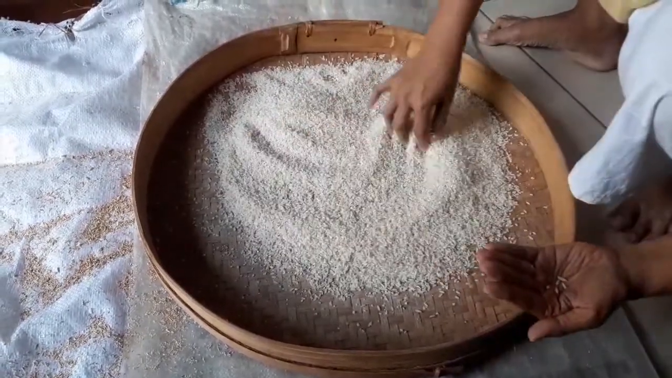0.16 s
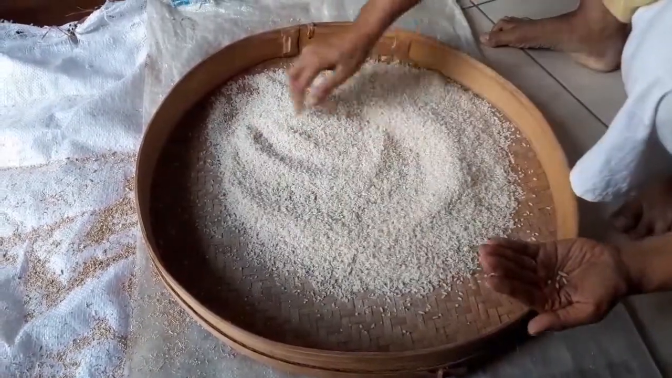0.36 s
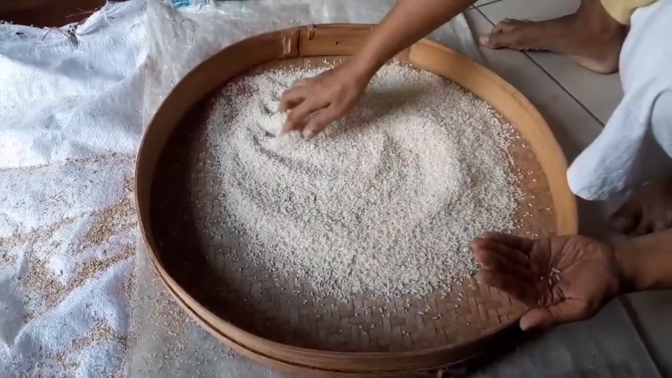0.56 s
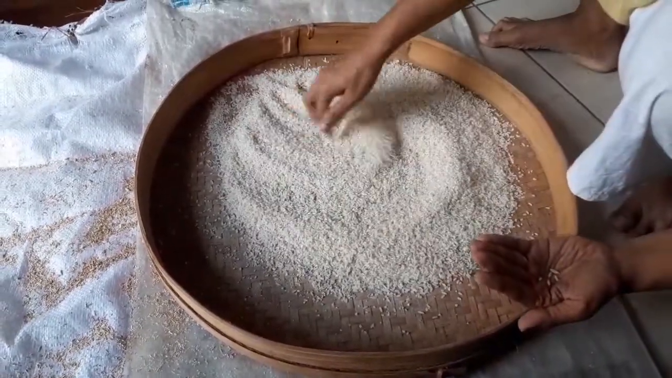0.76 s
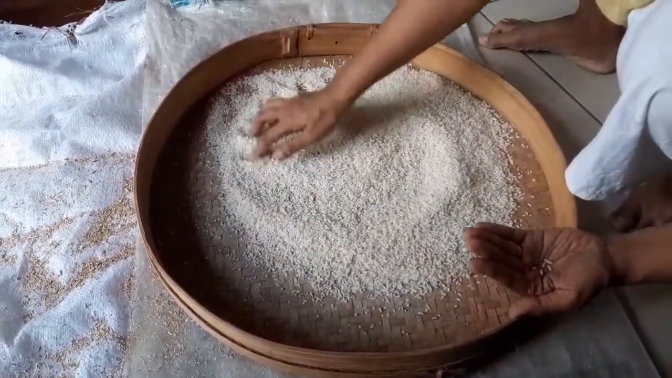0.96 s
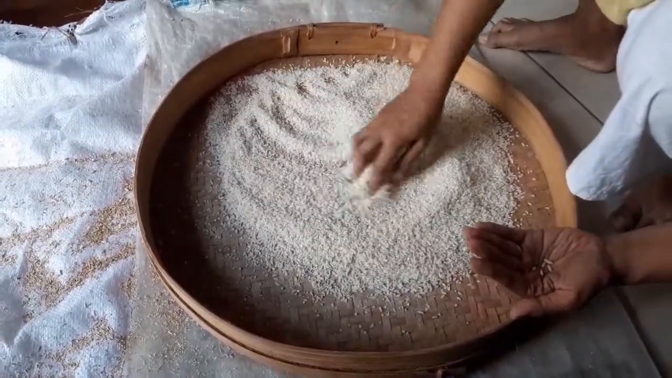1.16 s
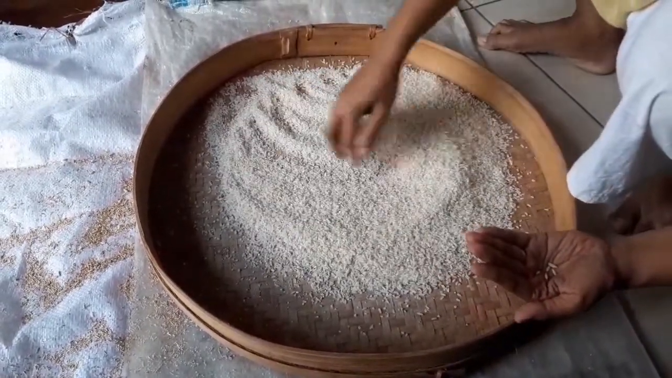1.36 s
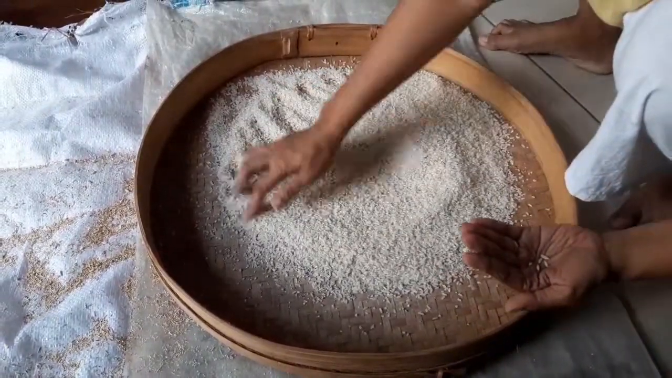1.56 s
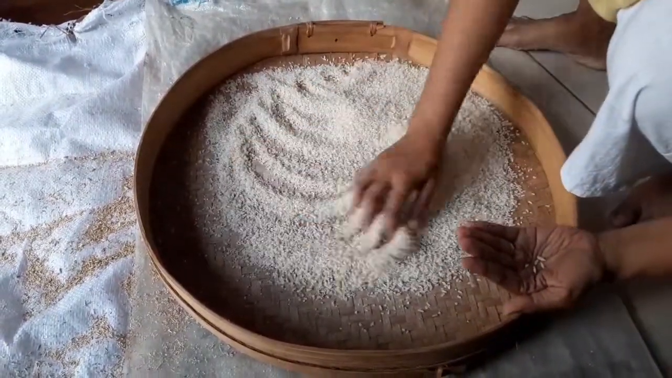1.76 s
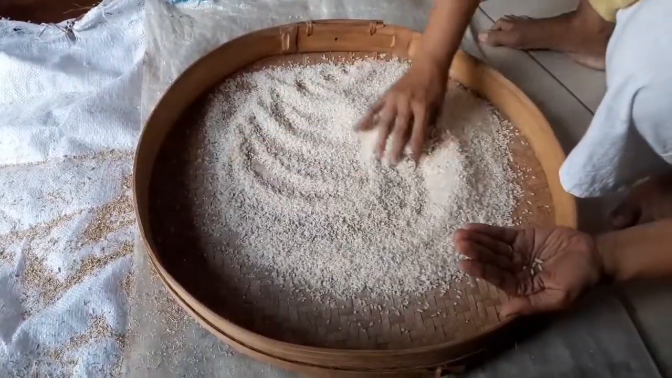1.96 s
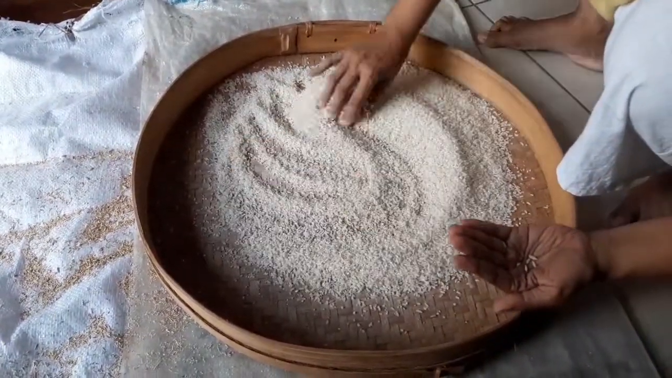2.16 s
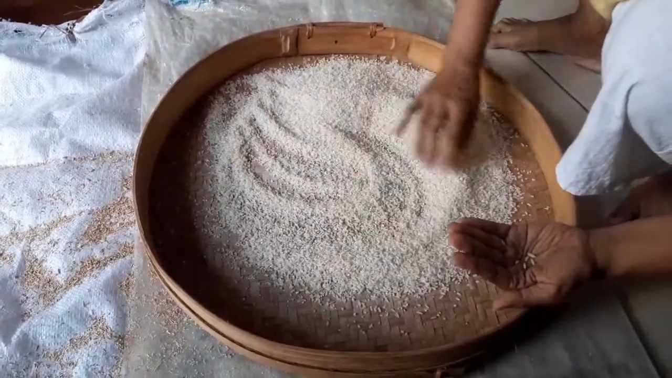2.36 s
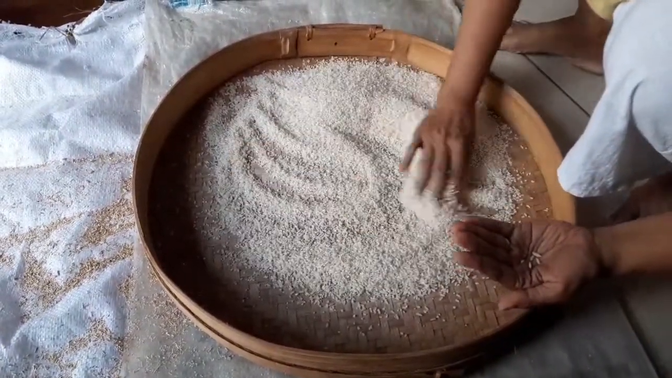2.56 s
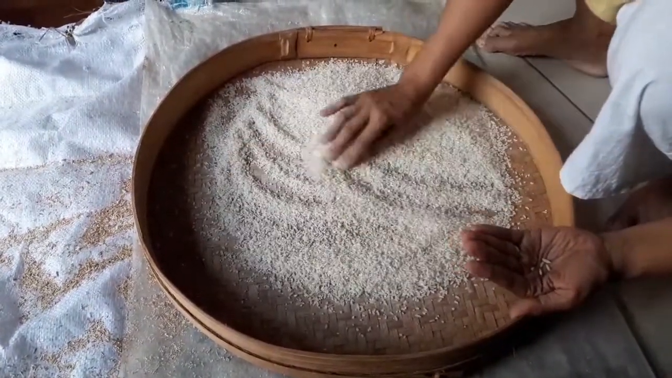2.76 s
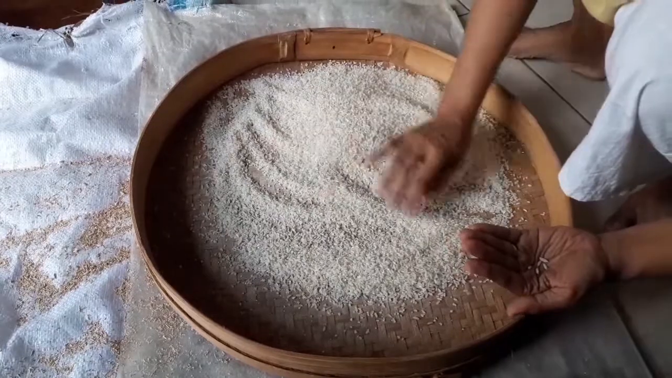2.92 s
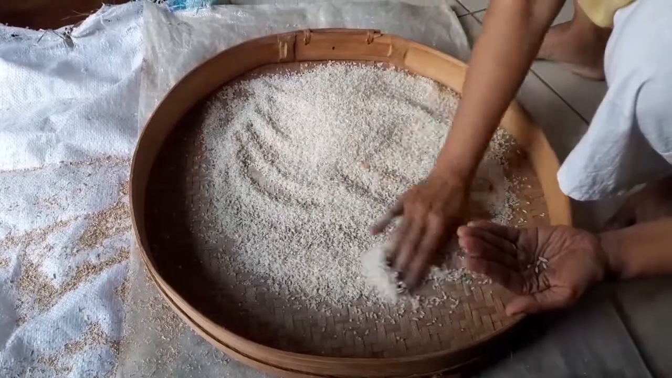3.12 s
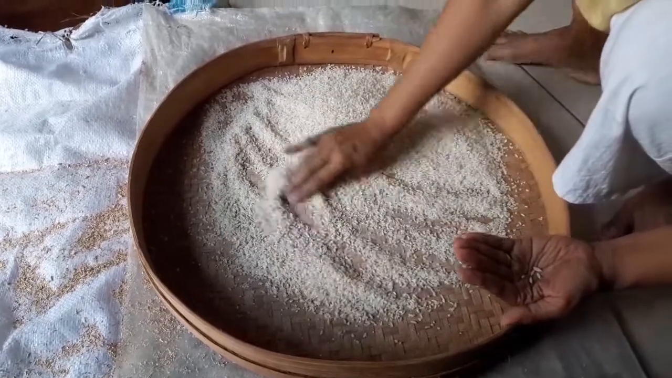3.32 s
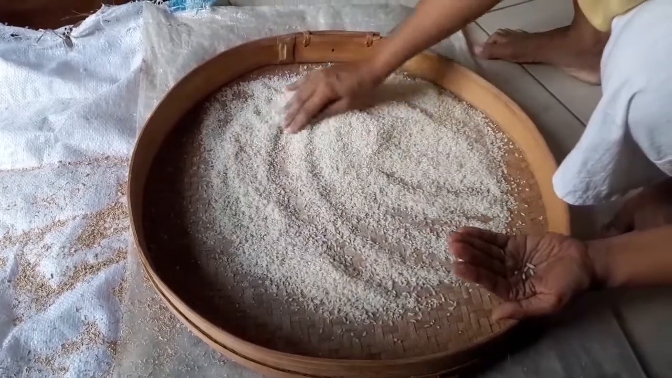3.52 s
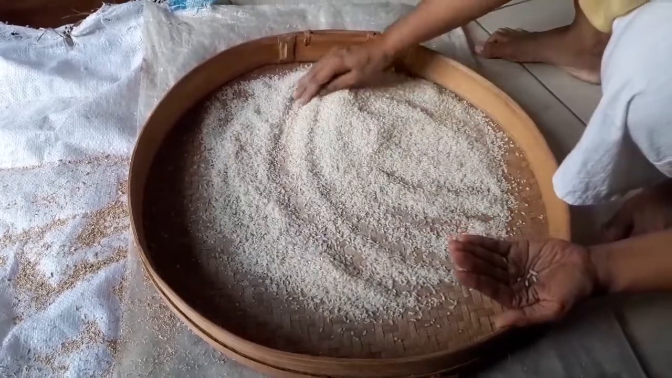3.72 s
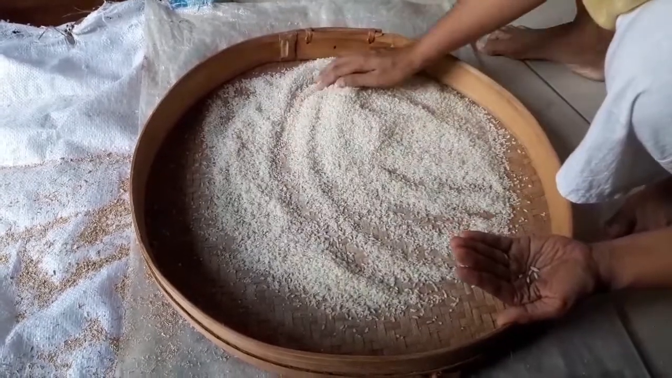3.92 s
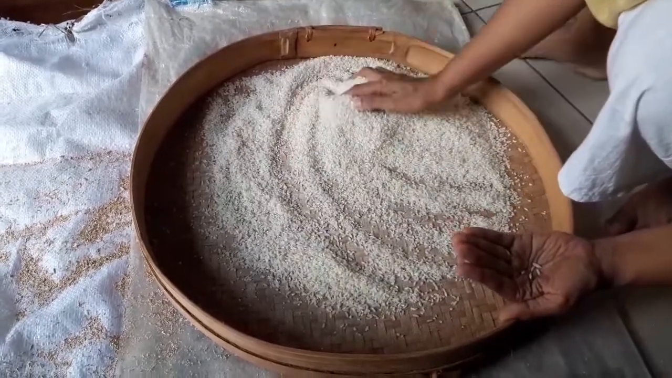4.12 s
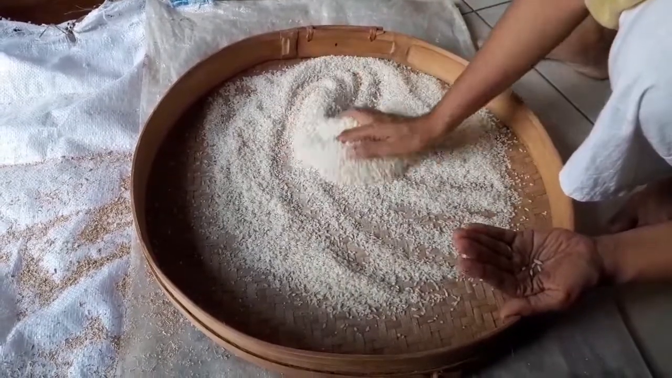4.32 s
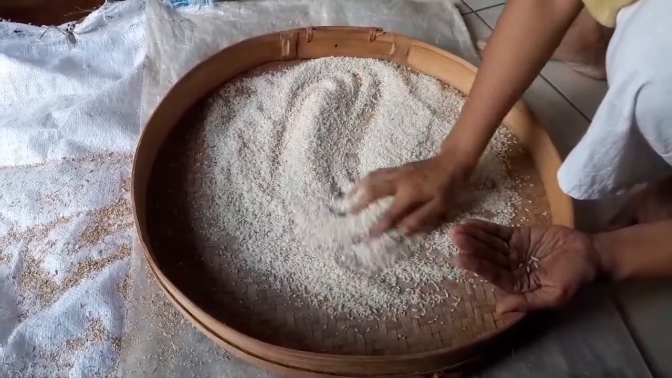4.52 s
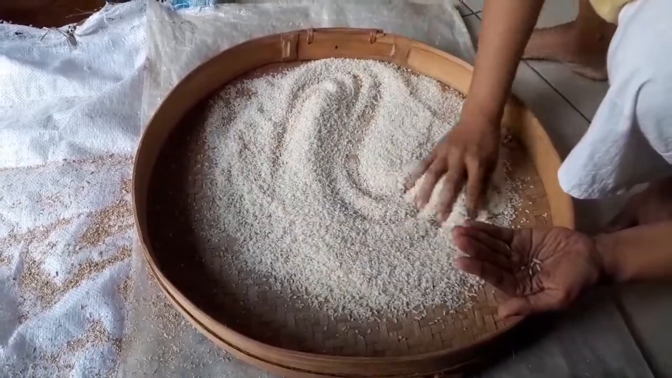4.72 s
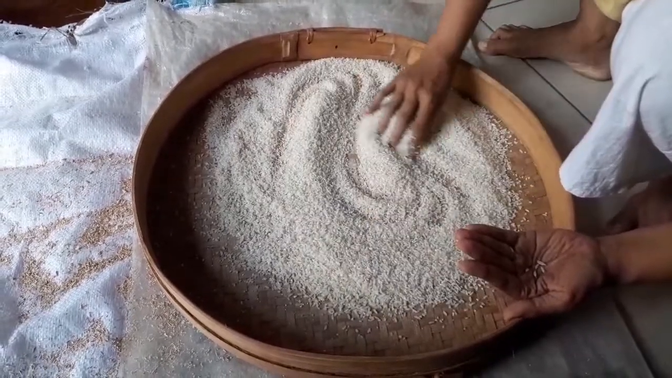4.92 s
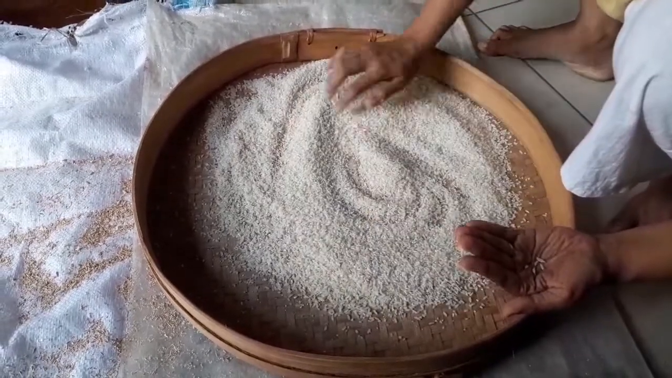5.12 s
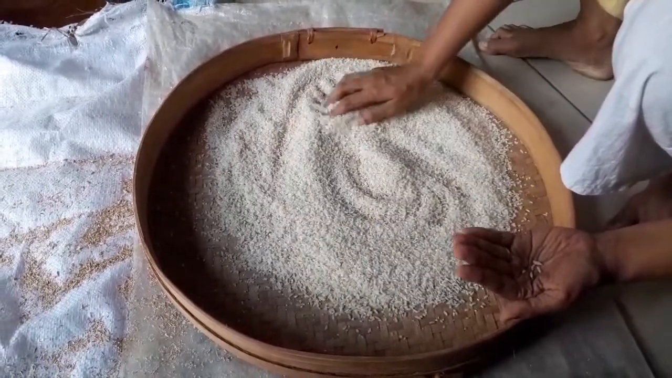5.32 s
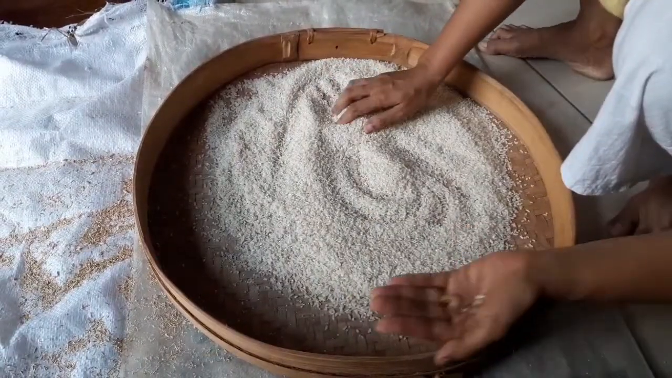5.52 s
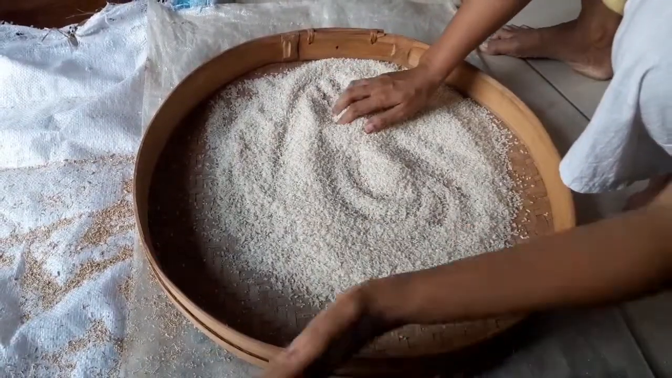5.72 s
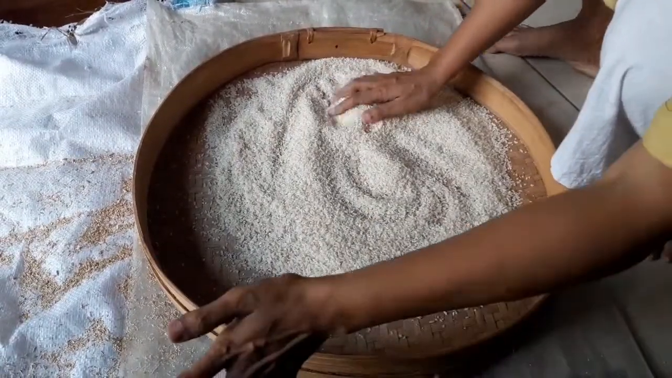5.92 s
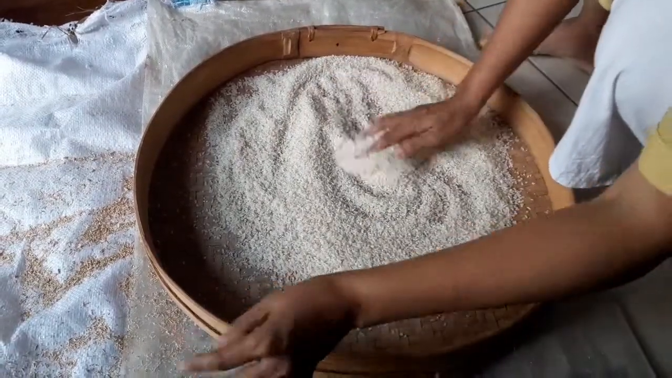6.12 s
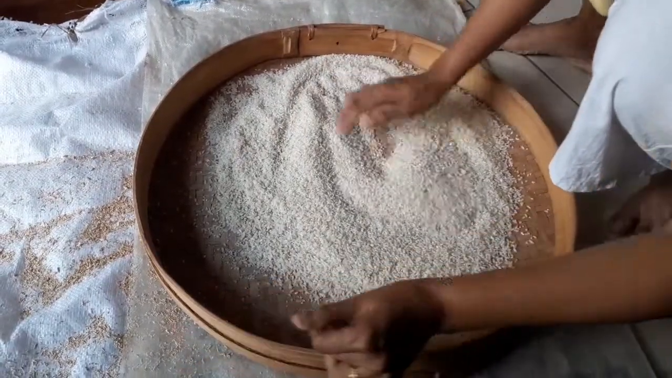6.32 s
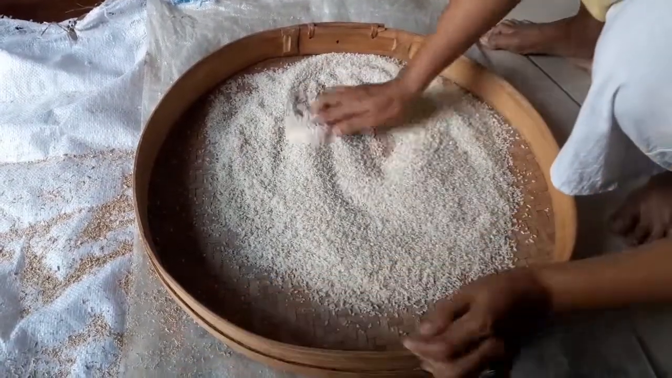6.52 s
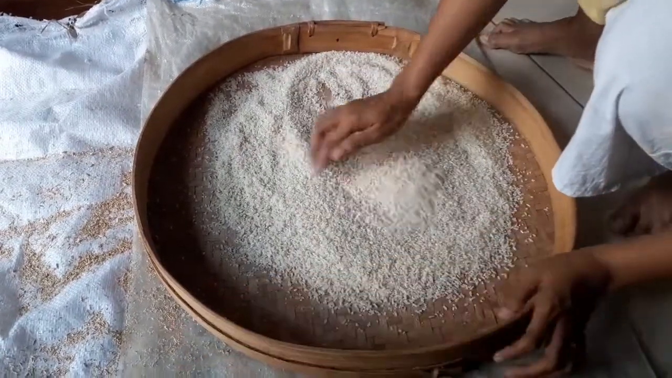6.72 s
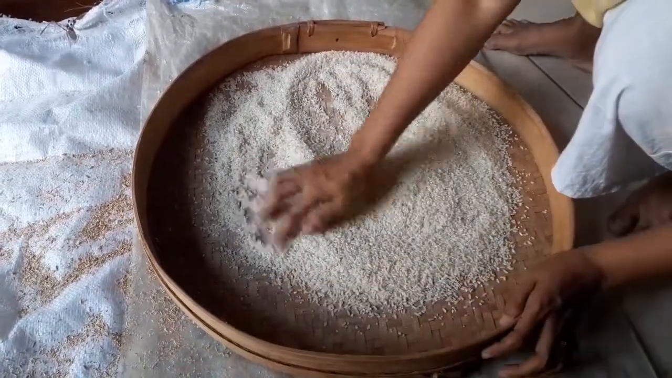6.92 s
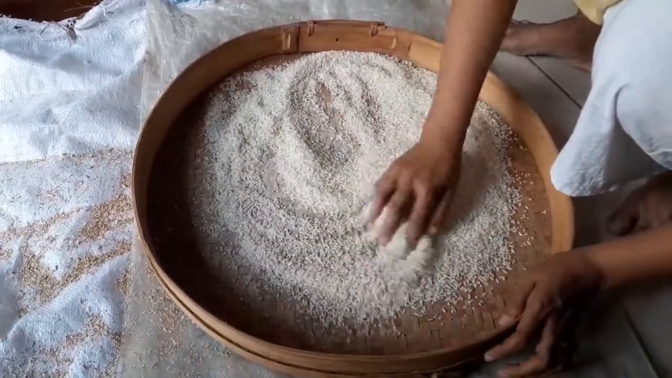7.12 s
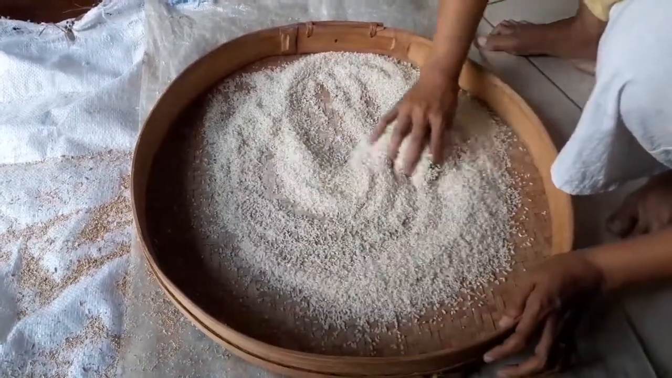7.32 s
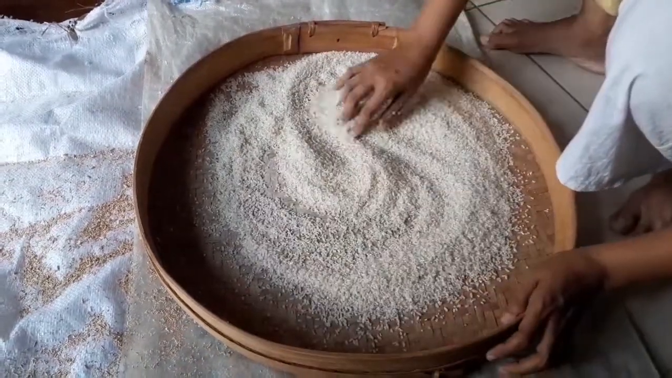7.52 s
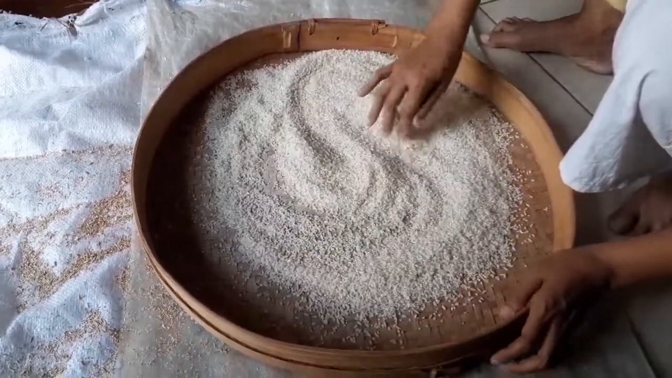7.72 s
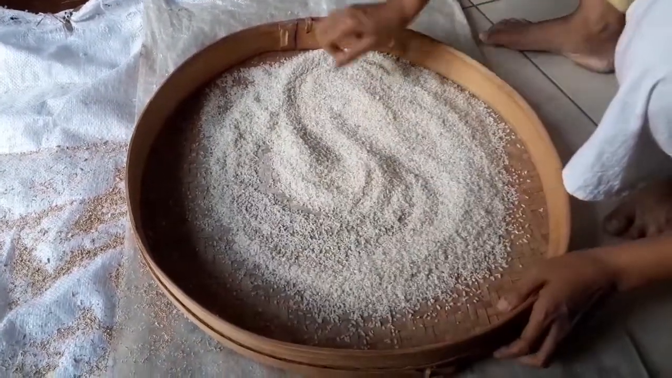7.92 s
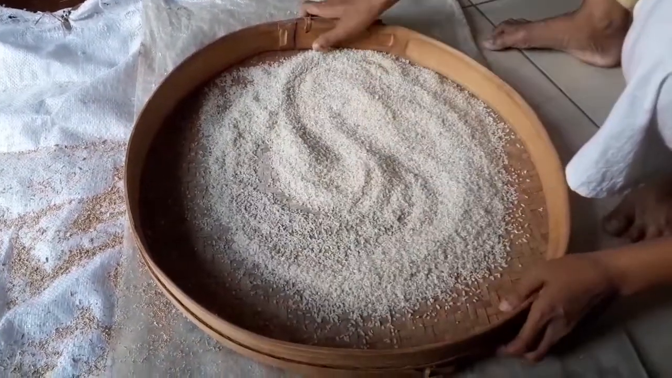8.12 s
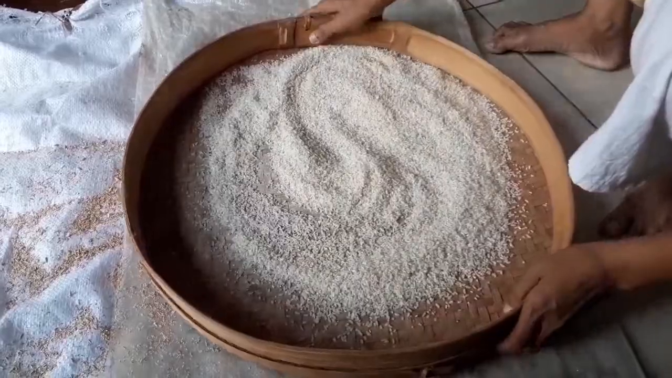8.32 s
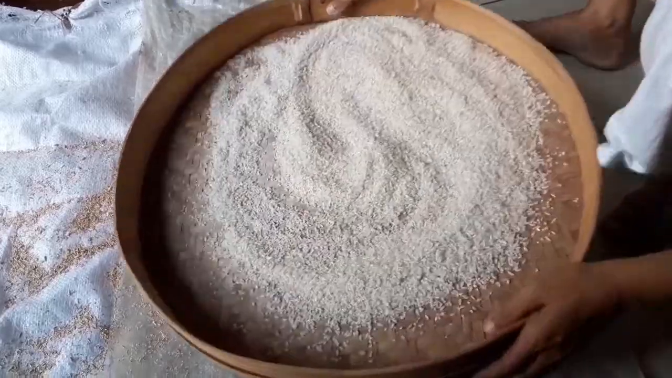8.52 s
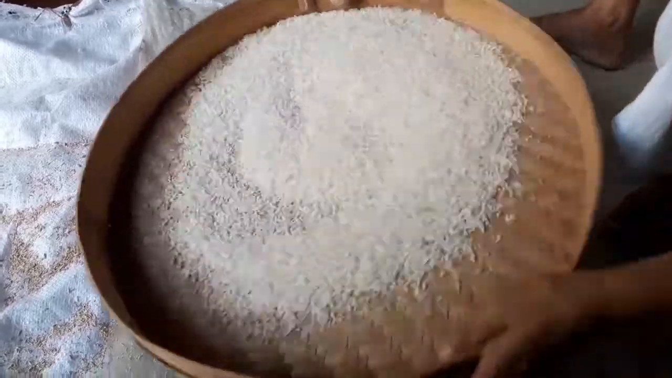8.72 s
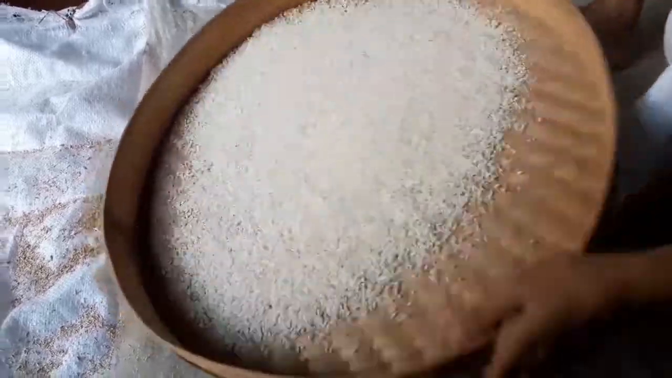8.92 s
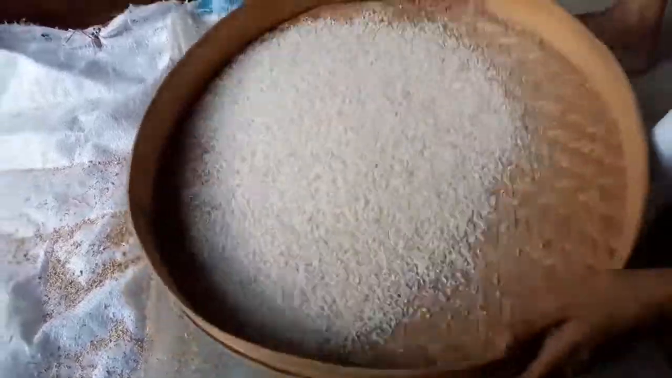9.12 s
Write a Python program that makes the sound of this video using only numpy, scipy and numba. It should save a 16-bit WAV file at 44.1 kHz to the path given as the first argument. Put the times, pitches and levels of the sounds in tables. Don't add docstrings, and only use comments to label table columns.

```python
import sys
import numpy as np
from scipy import signal
from scipy.fft import rfft, irfft, next_fast_len
from scipy.io import wavfile
from scipy.ndimage import uniform_filter1d, map_coordinates
from numba import njit

SR = 44100
rng = np.random.default_rng(int(sys.argv[2]) if len(sys.argv) > 2 else 0)


def digitize_waveform(pressure):
    field = np.atleast_2d(pressure).T
    bounded = np.clip(field, -1, 1)
    quanta = np.round(bounded * 32767).astype(np.int16)
    wavfile.write(sys.argv[1], SR, quanta)


def volts_from_db(level):
    exponent = np.asarray(level, float) / 20
    return 10 ** exponent


N = 408807


def colour(x, spectrum):
    size = next_fast_len(N)
    points_hz, points_db = np.transpose(spectrum)
    bins_hz = np.arange(size // 2 + 1) * SR / size
    gain_db = np.interp(np.log(bins_hz + 1), np.log(points_hz), points_db, left=-150, right=-150)
    return irfft(rfft(x, size) * volts_from_db(gain_db), size)[..., :N]


def set_rms(x, db):
    return x * volts_from_db(db) / np.sqrt(np.mean(x ** 2))


def butter(x, order, hz, kind="low"):
    return signal.sosfilt(signal.butter(order, hz, kind, fs=SR, output="sos"), x)


def decay(t, t60_s):
    return np.exp(-np.log(1000) * t / t60_s)


def walk(rate):
    steps = rng.standard_normal(N // 100)
    return map_coordinates(steps, [np.arange(N) * rate / SR], order=1)


def sides(pan_db):
    return volts_from_db(np.array([pan_db, -pan_db]) / 2)


# (f/Hz, level/dB per Hz)
AIR_SPECTRUM = [(38, -25), (64, -3.5), (77, -4.5), (150, -6), (202, -7.5), (237, -10), (278, -9),
                (335, -10.5), (421, -15.5), (542, -10.5), (1160, -27), (12300, -41.5), (15500, -53)]
AIR_DB, AIR_PAN_DB = -58, -3.5
RUMBLE_SWING_DB, RUMBLE_PER_S = 1.2, 5


def air():
    mid, side = colour(rng.standard_normal((2, N)), AIR_SPECTRUM)
    side = butter(side, 1, 500, "high") + 0.34 * side
    both = set_rms(np.array([mid + side, mid - side]), AIR_DB)
    bass = butter(both, 1, 300)
    swell = volts_from_db(RUMBLE_SWING_DB * walk(RUMBLE_PER_S))
    return (both + (swell - 1) * bass) * sides(AIR_PAN_DB)[:, None]


# (multiple of the shaft rate, level/dB rms)
MOTOR_HARMONICS = [(2, -69), (3, -72), (4, -77), (5, -75), (6, -76), (7, -74), (10, -72), (11, -68),
                   (12, -82), (13, -83), (14, -73), (17, -81)]
SHAFT_HZ, SHAFT_DB = 48.45, -61.5
BEAT_HZ, BEAT_LOUD_S = 4.05, 2.95
FAR_DB, FAR_MIDDLE_S, FAR_WIDTH_S = -62.5, 3.5, 1.8


def motor():
    t = np.arange(N) / SR
    turn = 2 * np.pi * SHAFT_HZ * t
    far = volts_from_db(FAR_DB) * np.exp(-((t - FAR_MIDDLE_S) / FAR_WIDTH_S) ** 2)
    far_turn = turn + 2 * np.pi * BEAT_HZ * (t - BEAT_LOUD_S)
    tones = volts_from_db(SHAFT_DB + 3.5 * walk(6)) * np.sin(turn) + far * np.sin(far_turn)
    for multiple, db in MOTOR_HARMONICS:
        wavering = volts_from_db(db + 1.5 * walk(6))
        tones = tones + wavering * np.sin(multiple * turn + .3 * walk(4))
    return np.sqrt(2) * tones * sides(-2.5)[:, None]


ROOM_T60_S, ROOM_DB = 0.41, -12.5


def room(x):
    t = np.arange(SR // 2) / SR
    after_direct = t > .004
    mid, side = rng.standard_normal((2, len(t))) * decay(t, ROOM_T60_S) * after_direct
    side = butter(side, 1, 900, "high")
    tail = butter(np.array([mid + side, mid - side]), 1, 6000)
    tail /= np.sqrt(np.sum(tail ** 2, axis=1, keepdims=True))
    source = x.mean(axis=0, keepdims=True)
    return volts_from_db(ROOM_DB) * signal.fftconvolve(source, tail, axes=1)[:, :N]


# (f/Hz, level/dB, t60/s)
RIM_MODES = [(329, -12, 0.26), (500, -3, 0.051), (580, 2, 0.029), (855, 6.5, 0.0089), (1510, -7, 0.0086),
             (2420, 0, 0.0077)]
# (t/s, peak level/dB, pitch factor of the struck spot)
RIM_THUMPS = [
    (5.9535, -30.5, 2.05),
    (8.3355, -31.5, 1.1),
    (8.3485, -42, 1.2),
    (8.579, -41, 1.8),
]


def thumps():
    t = np.arange(SR // 8) / SR
    out = np.zeros(N)
    for s, peak_db, factor in RIM_THUMPS:
        ring = np.zeros(len(t))
        for hz, db, t60_s in RIM_MODES:
            ring += volts_from_db(db) * np.sin(2 * np.pi * factor * hz * t) * decay(t, t60_s)
        out[int(s * SR):][:len(t)] += volts_from_db(peak_db) * ring / np.abs(ring).max()
    return out * sides(-7.0)[:, None]


# (t/s, peak level/dB, body minus peak level/dB, left minus right level/dB, ring f/Hz)
LONE_KNOCKS = [(.371, -36, -24, -5, 2900), (0.4319, -44, -7, -15, 3100), (.462, -47, -20, -2, 3400),
               (.484, -48, -20, 0, 7000), (0.4985, -41, -12, 0, 2720), (0.8377, -43, 2, 6, 7670),
               (0.963, -42, -6, 2, 2780), (1.4352, -43.5, -25.5, -6, 7450), (1.559, -35, -7, 4, 8210),
               (2.5226, -48, -8, -4, 3960), (2.9228, -45, 8, 3, 3070), (2.95, -41, -6, -2, 2485),
               (3.073, -34, -18, -9, 2540), (3.693, -41, -15, 1, 2650), (5.2513, -31, -28.5, -11, 3690),
               (5.645, -40, -24, 1, 7000), (6.8465, -41, -5.5, -2.0, 2510), (6.8797, -32, -4, 2, 8380),
               (8.2544, -48.5, -8, -2, 7780), (8.336, -33, -21, -4.0, 7400), (8.3494, -36, -12, -10, 4040),
               (8.4144, -31.5, -13, 2, 6500), (8.446, -32, -22, -1, 5500)]
KNOCK_T60_S = .012


def knocks():
    crack, body = np.zeros((2, 2, N))
    t = np.arange(SR // 8) / SR
    for s, peak_db, body_db, pan_db, hz in LONE_KNOCKS:
        i = int(s * SR)
        burst = rng.standard_normal((2, len(t))) * decay(t, KNOCK_T60_S)
        burst[:, 0] = 2
        burst *= volts_from_db(peak_db) * sides(pan_db)[:, None]
        ring = signal.lfilter(*signal.iirpeak(hz, 2.2, SR), burst)
        crack[:, i:i + len(t)] += 0.5 * burst + 2.0 * ring
        body[:, i:i + len(t)] += volts_from_db(body_db) * burst.mean(axis=0)
    return volts_from_db(-3.5) * butter(crack, 2, 2600, "high") + volts_from_db(-26.0) * butter(body, 1, [250, 1600], "band")


TOUCH_DB, RISE_CURVE, SAG_DB, SETTLE_DB_PER_S = 18, 3.2, 9, 167
CONTACT_S = .006


def surge(t, start, rise, fall, peak_db):
    u, rise, fall = t - start, max(rise, .003), max(fall, .003)
    before = 60 * np.clip(-u / CONTACT_S, 0, 3)
    touch = TOUCH_DB * np.clip(1 - u / rise, 0, 1) ** RISE_CURVE
    sag = SAG_DB * np.clip((u - rise) / fall, 0, 1) ** 2
    settle = SETTLE_DB_PER_S * np.maximum(u - rise - fall, 0)
    return peak_db - before - touch - sag - settle


# (touch t/s, speeding up t/s, slowing down t/s, grain ticks level/dB at full speed, finger depth level/dB)
HAND_SWEEPS = [(-0.149, 0.16, 0.19, -33.5, 1.5), (0.496, 0.19, 0.066, -37.5, 1.5),
               (0.954, 0.19, 0.16, -33.5, 2.5), (1.555, 0.18, 0.33, -32.5, 4.5),
               (1.977, 0.12, 0.25, -42.5, -2), (2.177, 0.084, 0.099, -44.5, 5),
               (2.51, 0.16, 0.11, -35, 1.5), (3.065, 0.18, 0.23, -31.5, 4), (3.67, 0.096, 0.094, -50, 3),
               (3.838, 0.24, 0.16, -43.5, 2), (4.151, 0.48, 0.372, -33.5, 0), (4.723, 0.21, 0.12, -39, 0.5),
               (5.243, 0.14, 0.06, -42.5, 2), (5.882, 0.09, 0.05, -47, 1.5),
               (6.007, 0.19, 0.083, -35.5, -1), (6.49, 0.11, 0.12, -34, 0.5), (6.87, 0.17, 0.38, -32, 2.5),
               (7.31, 0.15, 0.13, -35.5, 1), (7.599, 0.06, 0.069, -41, 3)]
# (start t/s, rise t/s, fall t/s, grain ticks level/dB)
ROLL_BACKS = [(0.27, 0.034, 0.063, -46.5), (0.823, 0.016, 0.052, -53.5), (1.395, 0.012, 0.16, -60),
              (2.429, 0.025, 0.048, -72), (2.82, 0.0072, 0.11, -53.5), (3.532, 0.082, 0.2, -59.5),
              (5.06, 0.031, 0.084, -49), (5.519, 0.0076, 0.015, -61), (5.645, 0.004, 0.023, -60.5),
              (6.3, 0.013, 0.008, -45), (6.462, 0.012, 0.017, -53.5), (6.771, 0.02, 0.11, -60),
              (7.76, 0.018, 0.042, -65), (7.86, 0.03, 0.04, -65.5), (7.94, .03, .1, -71.5),
              (8.04, 0.03, 0.03, -66), (8.11, 0.066, .1, -67.5), (8.2, 0.045, 0.23, -64)]
# (start t/s, rise t/s, fall t/s, grain ticks level/dB)
TRAY_SHAKES = [
    (8.337, 0.0037, 0.017, -49),
    (8.35, 0.038, 0.42, -54),
    (8.572, 0.042, 0.06, -44.5),
    (8.668, 0.092, 0.049, -26.5),
    (8.786, 0.076, 0.042, -25.5),
    (8.891, 0.07, 0.08, -24),
    (9.041, 0.013, 0.09, -30),
    (9.142, 0.012, 0.064, -40),
]
# (deepest t/s, half length t/s, extra depth level/dB, palm hollow f/Hz)
FINGER_DIGS = [(0.026, 0.07, 5, 1660), (1.155, 0.06, 4, 2500), (1.773, 0.096, 3.5, 1630),
               (2.65, 0.24, 2.5, 2270), (3.206, 0.079, 2, 1850), (3.775, 0.11, 4.5, 2620),
               (4.004, .08, 5.5, 2700), (4.52, 0.13, 5.5, 1800), (4.718, 0.11, 6.5, 2100),
               (6.198, 0.064, 1, 2420), (6.308, .05, 5.5, 1800), (6.943, 0.069, 2.5, 1702),
               (7.145, .1, 4.5, 2000), (7.85, .08, 3.5, 1390), (8.16, .05, 6, 1300),
               (9.182, 0.071, -3, 1950)]
SKIM_HOLLOW_DB, SKIM_WEAVE_DB, SKIM_PALM_HZ = -10, -20, 2300
WEAVE_PER_DEPTH, PALM_HZ_PER_DEPTH, WEAVE_PER_DIG = 1.28, 54.6, .9
# (hollows level/dB, weave level/dB, air pocket f/Hz)
ROLLING, LIFTED = (-8.5, -18.5, 2400), (-6, -4, 1850)
POCKET_PER_DB, POCKET_CLIMB = 0.09, 0.063


def motion():
    t = np.arange(0, N / SR + .002, .001)
    surges = [*HAND_SWEEPS, *ROLL_BACKS, *TRAY_SHAKES]
    power = np.array([volts_from_db(2 * surge(t, *row[:4])) for row in surges]) + 1e-30
    total = power.sum(axis=0)
    colours = []
    for *_, depth_db in HAND_SWEEPS:
        colours.append((SKIM_HOLLOW_DB + depth_db,
                        SKIM_WEAVE_DB + WEAVE_PER_DEPTH * depth_db,
                        SKIM_PALM_HZ - PALM_HZ_PER_DEPTH * depth_db))
    colours += [ROLLING] * len(ROLL_BACKS) + [LIFTED] * len(TRAY_SHAKES)
    hollow_db, weave_db, palm_hz = np.transpose(colours) @ power / total
    closed = np.zeros(len(t))
    for s, half_s, depth_db, hz in FINGER_DIGS:
        u = (t - s) / half_s
        down = np.exp(-u ** 2)
        hollow_db = hollow_db + depth_db * down
        weave_db = weave_db + WEAVE_PER_DIG * depth_db * down
        palm_hz = palm_hz + down * (hz * (1 + POCKET_CLIMB * u) - palm_hz)
        closed = closed + POCKET_PER_DB * depth_db * down
    curves = (10 * np.log10(total), hollow_db, weave_db, palm_hz, closed)
    return [np.interp(np.arange(N) / SR, t, curve) for curve in curves]


GRAINS_PER_S, GRAIN_SPREAD_DB, BIGGEST_DB = 30000, 2.5, 8
PORT_LAG_S = .00013


def collisions():
    when, size, sign = rng.random((int(GRAINS_PER_S * N / SR), 3)).T
    lag = PORT_LAG_S * SR * rng.standard_normal(len(when))
    force_db = np.minimum(-GRAIN_SPREAD_DB * np.log(size), BIGGEST_DB)
    force = np.sign(sign - .5) * volts_from_db(force_db)
    ports = []
    for side in (1, -1):
        at = np.clip(when * N + side * lag / 2, 0, N - 1).astype(int)
        ports.append(np.bincount(at, force, N))
    return np.array(ports)


@njit
def resonate(x, hz, k):
    y, band, low = np.empty(len(x)), 0., 0.
    for i in range(len(x)):
        g = np.tan(np.pi * hz[i] / SR)
        v = (band + g * (x[i] - low)) / (1 + g * (g + k))
        band, low, y[i] = 2 * v - band, low + 2 * g * v, k * v
    return y


# (f/Hz, level/dB per Hz)
TICK_SPECTRUM = [(1650, -16), (2800, -4.5), (6490, -5.5), (7830, -4), (9500, -6), (12200, -4), (14900, -9),
                 (15600, -8.5)]
HOLLOW_SPECTRUM = [(590, -47), (1000, -9), (1130, -2), (1240, -3.5), (1450, 3.5), (1750, 3.5), (1950, -2),
                   (2130, 1.5), (2310, -1), (3300, -8.5), (4290, -2.5), (7260, -120)]
WEAVE_SPECTRUM = [(150, -26.5), (250, -12), (276, -13.5), (334, -5.5), (382, -19), (414, -9.5), (640, -6),
                  (694, -1), (1000, -3), (1300, -13), (2200, -120)]
PALM_WIDTH, POCKET_WIDTH = 0.73, 0.15


def rice():
    tick_db, hollow_db, weave_db, palm_hz, closed = motion()
    clicks = collisions() * volts_from_db(.5 * walk(30) + 0.64 * walk(120))
    ticks = set_rms(colour(clicks, TICK_SPECTRUM), 2.95)
    dull = butter(ticks, 1, 5500)
    bright_db = np.clip(0.28 * (tick_db + 35), -4., 0) + 0.93 * walk(14)
    ticks = dull + volts_from_db(bright_db) * (ticks - dull)
    heap = colour(clicks, HOLLOW_SPECTRUM)
    palm = np.array([resonate(side, palm_hz, PALM_WIDTH) for side in heap])
    pocket = np.array([resonate(side, palm_hz, POCKET_WIDTH) for side in heap])
    cupped = .5 * heap + palm + 2 * closed * pocket
    hollows = volts_from_db(hollow_db + 0.29 * walk(40)) * set_rms(cupped, 0.35)
    weave = volts_from_db(weave_db + 0.17 * walk(25)) * set_rms(colour(clicks, WEAVE_SPECTRUM), 0.083)
    return (ticks + hollows + weave) * volts_from_db(tick_db) * sides(-1.5 + 0.11 * (tick_db + 27))


def scene():
    tray = rice() + knocks() + thumps()
    return tray + room(tray) + motor() + air()


GATE_S, GATE_OPEN_DB, GATE_SLOPE, GATE_MOST_DB, GATE_HZ = 0.15, -40, 0.18, -3, 696


def gate(x):
    size = int(GATE_S * SR)
    power = uniform_filter1d(uniform_filter1d(np.mean(x ** 2, axis=0), size), size)
    loud_db = 10 * np.log10(power + 1e-12)
    bass = signal.sosfiltfilt(signal.butter(2, GATE_HZ, fs=SR, output="sos"), x)
    gain_db = np.clip(GATE_SLOPE * (loud_db - GATE_OPEN_DB), GATE_MOST_DB, 0)
    return x + (volts_from_db(gain_db) - 1) * bass


def top_cut(x):
    return signal.sosfilt(signal.butter(12, 16390, fs=SR, output="sos"), x)


def record(dry):
    wet = np.tanh(2 * gate(dry)) / 2
    wet = butter(wet, 4, 40, "high")
    wet = signal.sosfilt(signal.ellip(8, .2, 70, 15700, fs=SR, output="sos"), wet)
    return top_cut(wet)


dry = scene()
out = record(dry)
digitize_waveform(out)
```